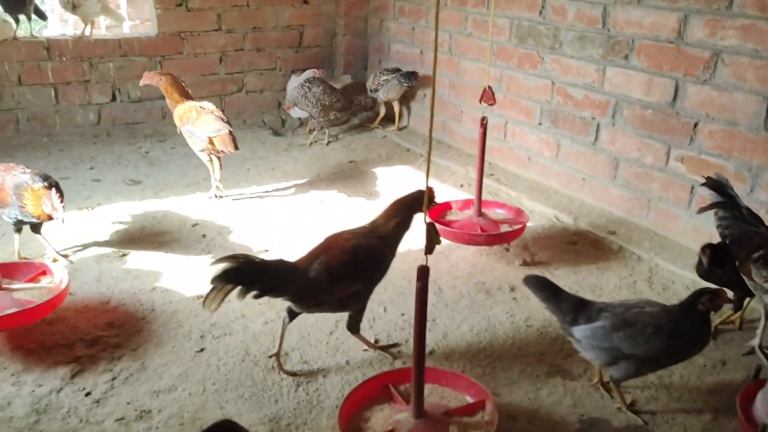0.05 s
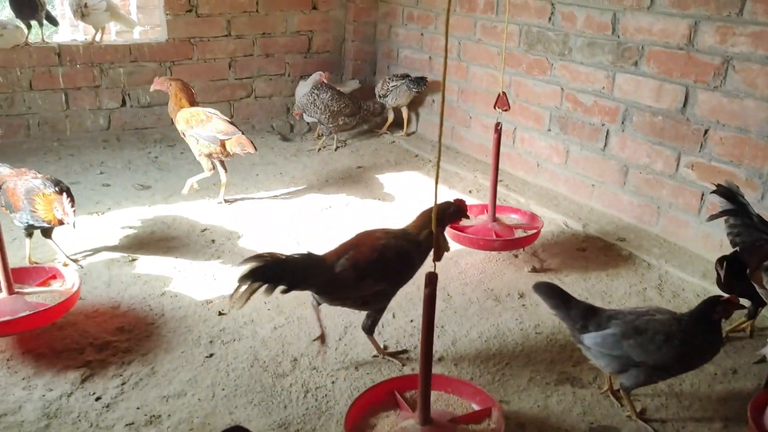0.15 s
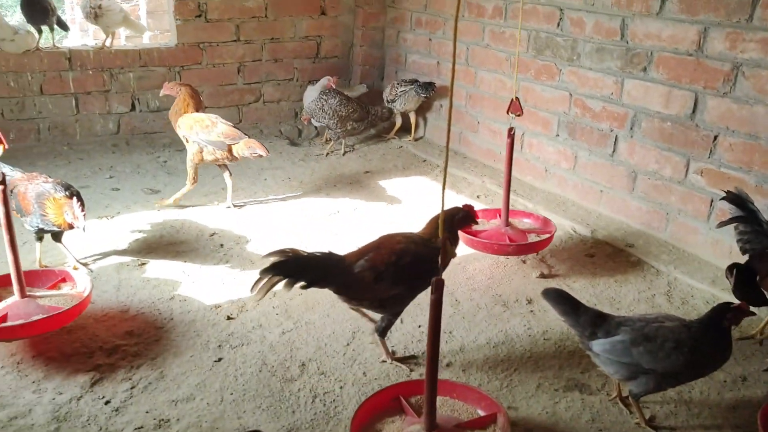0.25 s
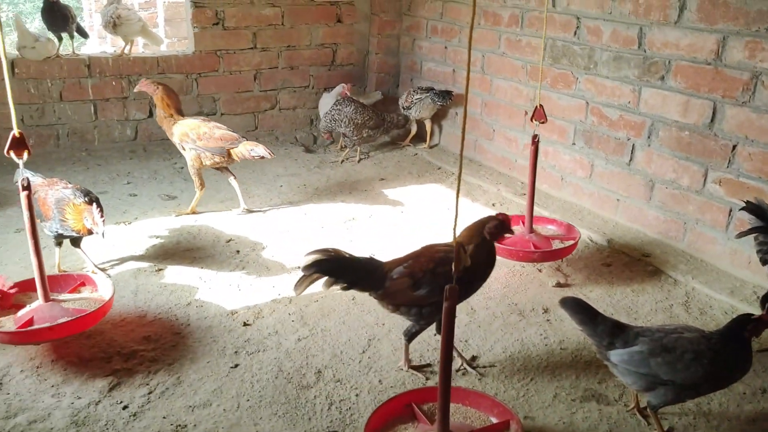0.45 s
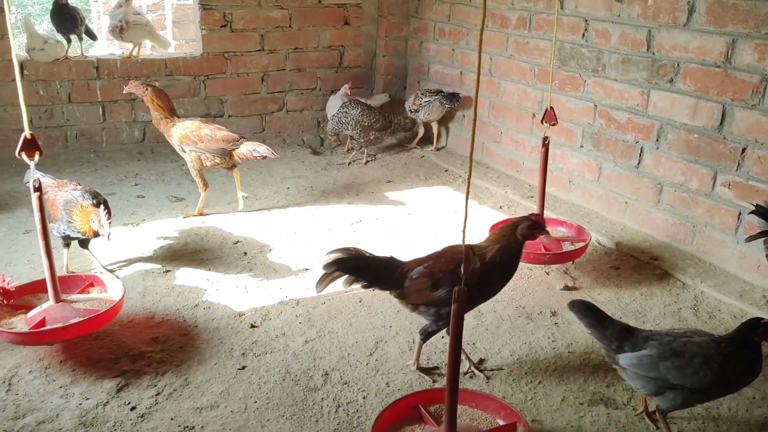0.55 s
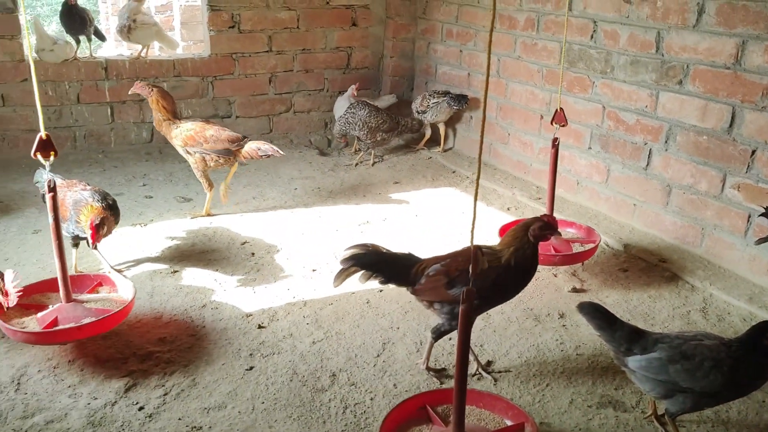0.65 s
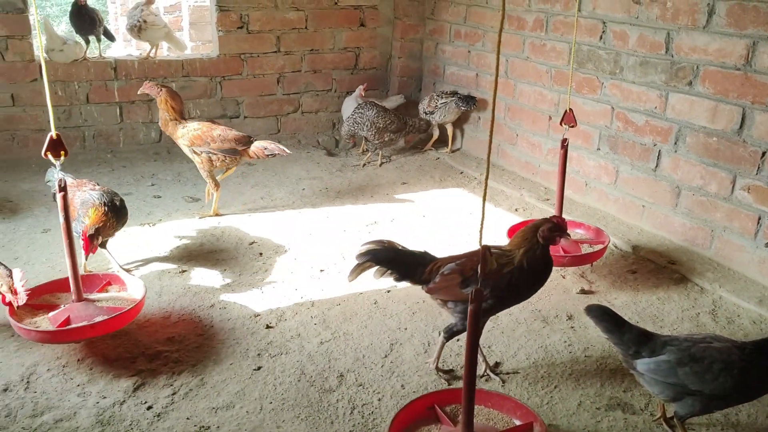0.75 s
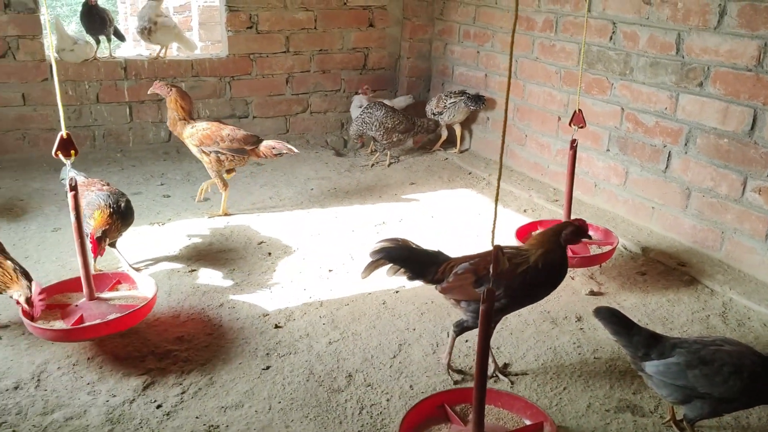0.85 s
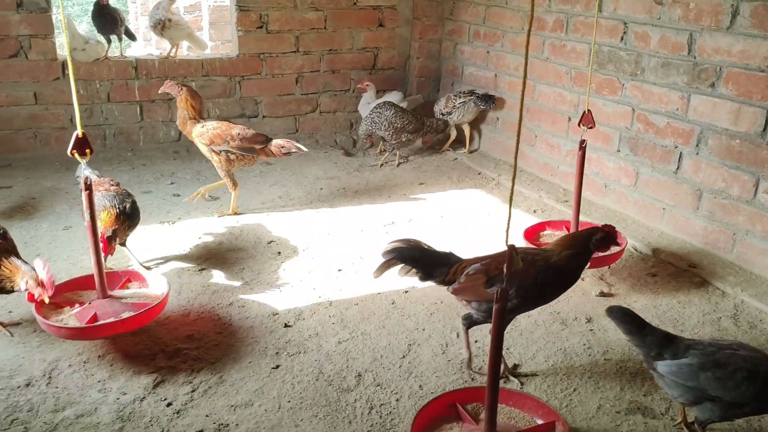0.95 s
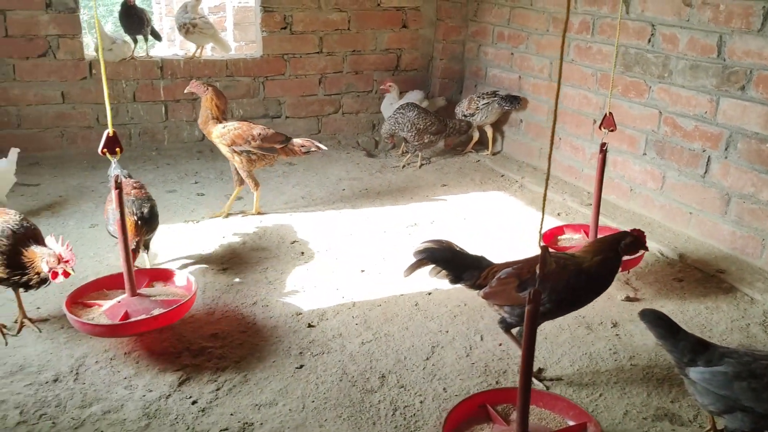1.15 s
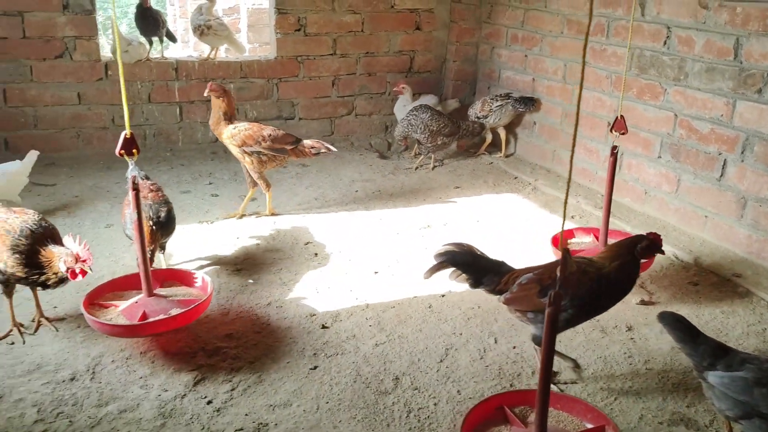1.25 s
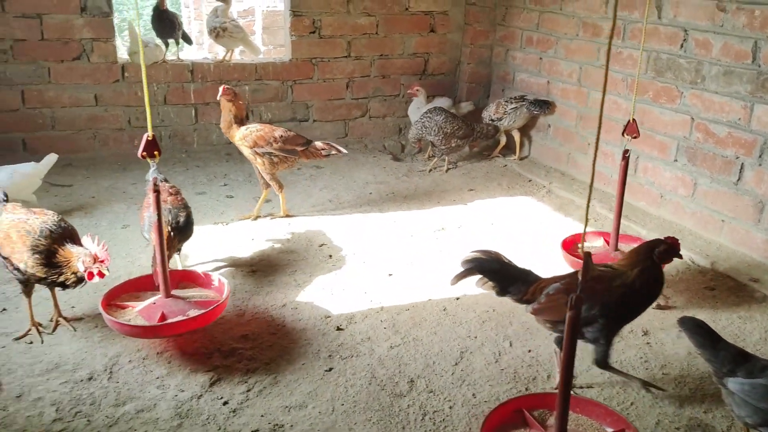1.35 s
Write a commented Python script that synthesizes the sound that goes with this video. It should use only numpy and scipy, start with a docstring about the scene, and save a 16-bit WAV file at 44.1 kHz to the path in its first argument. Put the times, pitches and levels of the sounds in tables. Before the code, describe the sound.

A hen gives one drawn-out cluck while young birds peep in a small coop.

```python
"""Chickens in a small brick coop, over a low rumble, rustling litter and a faint hum.
A light tap, then a hen gives one drawn-out cluck: her voice pulses unevenly in a rasp and clears into a
steady nasal note. Young birds peep further off in mostly falling whistles; after the cluck one holds a
long cheep while a nearer bird squeaks. Three soft thumps pass underneath. Towards the end beaks and feet
tap on the feeders and the floor among the last peeps. The bare walls ring briefly after calls and taps."""
import sys
import numpy as np
from scipy import signal
from scipy.fft import rfft, irfft, next_fast_len
from scipy.io import wavfile
from scipy.ndimage import uniform_filter1d

SR = 44100
rng = np.random.default_rng(int(sys.argv[2]) if len(sys.argv) > 2 else 0)


def master(y):
    """Save y as 16-bit WAV."""
    cut = np.clip(np.atleast_2d(y).T, -1, 1)
    pcm = np.round(cut * 32767)  # scale
    wavfile.write(sys.argv[1], SR, pcm.astype(np.int16))


N = 61739
TIME = np.arange(N) / SR


def from_db(db):
    """Decibels to gain."""
    return 10 ** (np.asarray(db) / 20)


def rms_one(x):
    """Scale to unit power."""
    return x / np.sqrt(np.mean(x ** 2) + 1e-20)


def curve(rows, column):
    """One column of a table as an automation curve over time."""
    rows = np.array(rows)
    return np.interp(TIME, rows[:, 0], rows[:, column])


def loudness(rows):
    """A fader riding the table's last column, silent outside its span."""
    inside = (TIME >= rows[0][0]) & (TIME <= rows[-1][0])
    return from_db(curve(rows, -1)) * uniform_filter1d(inside * 1., size=128)


def at_hz(points, hz, column=1):
    """Read a table on a log-frequency axis."""
    points = np.array(points)
    return np.interp(np.log(hz + 1), np.log(points[:, 0]), points[:, column])


def drift(rate_hz):
    """Smooth random modulation of unit power."""
    r = np.exp(-2 * np.pi * rate_hz / SR)
    return rms_one(signal.lfilter([1], [1, -2 * r, r * r], rng.standard_normal(2 * N))[N:])


def colour(x, points, column=1):
    """Minimum-phase EQ along a table's curve; the result has unit power."""
    size = 2 * next_fast_len(N)
    gain = from_db(at_hz(points, np.fft.rfftfreq(size, 1 / SR), column))
    cepstrum = irfft(np.log(gain))
    cepstrum[1:size // 2] *= 2
    cepstrum[size // 2 + 1:] = 0
    return rms_one(irfft(rfft(x, size) * np.exp(rfft(cepstrum)))[:N])


def band(x, low, high, order=2):
    """Butterworth band-pass."""
    sos = signal.butter(order, [low, min(high, SR * .45)], "band", fs=SR, output="sos")
    return signal.sosfilt(sos, x)


def pulses(hz):
    """One click per cycle, shared between neighbouring samples."""
    turns = np.cumsum(hz) / SR
    at = np.interp(np.arange(1, int(turns[-1])), turns, np.arange(N))
    whole = at.astype(int)
    return np.bincount(whole, 1 - at % 1, N + 1)[:N] + np.bincount(whole + 1, at % 1, N + 1)[:N]


def resonance(x, hz, width_hz):
    """Two-pole resonance with gain 1 at its peak."""
    r = np.exp(-np.pi * width_hz / SR)
    feedback = [1, -2 * r * np.cos(2 * np.pi * hz / SR), r * r]
    return signal.lfilter(np.array([1, 0, -1]) * (1 - r * r) / 2, feedback, x + 1e-18)


def tone(hz, wobble, overtones_db=()):
    """A sine with optional overtones, its pitch wavering by the fraction `wobble`."""
    phase = 2 * np.pi * np.cumsum(hz * (1 + wobble * drift(101.4))) / SR
    return np.sqrt(2) * sum(from_db(db) * np.sin(k * phase) for k, db in enumerate([0, *overtones_db], 1))


# The rumble's EQ. Each row: frequency in Hz, relative level in dB.
RUMBLE_EQ = [(25, -38), (45, -12.5), (65, 0.5), (95, 4.5), (135, -4), (190, -3.5), (260, -3.5), (420, -6.5),
             (700, -9.5), (1200, -13.5), (1700, -17), (2400, -24), (3400, -21), (4600, -30), (8000, -38),
             (16000, -37.5)]
# Fader of the background hiss: rustling litter, plus a brief bright swell at the height of the
# hen's note. Each row: time in seconds, level in dB.
HISS_LEVEL = [(0, -59.5), (.1, -63.5), (.2, -70), (.4, -61.5), (.55, -69), (1.0, -70), (1.4, -70.5)]
# The hiss's EQ. Each row: frequency in Hz, relative level in dB.
HISS_EQ = [(300, -12), (1000, -0.5), (3300, -1), (5000, -5.5), (8000, -4.5), (15000, -20.5)]
# The tones of the hum. Each row: frequency in Hz, level in dB.
HUM_TONES = [(96, -67.5), (189, -69.5), (299, -66), (598, -72)]


def background():
    """The bed: a low noise rumble, a flickering hiss and a wavering hum."""
    rumble = from_db(-55) * colour(rng.standard_normal(N), RUMBLE_EQ)
    hiss_db = curve(HISS_LEVEL, 1) + 1.2 * drift(40)
    hiss = from_db(hiss_db) * colour(rng.standard_normal(N), HISS_EQ)
    hum = sum(from_db(db + 3 * drift(10)) * tone(hz, wobble=.013) for hz, db in HUM_TONES)
    return rumble + hiss + hum


# Soft low thumps. Each row: start in seconds, level in dB.
THUMPS = [(.29, -52), (.685, -67), (.95, -52.5)]


def thumps(hz=89.7, length_s=.052):
    """Each thump is a few cycles of a low tone, swelling and fading."""
    out = np.zeros(N)
    for start, db in THUMPS:
        age = TIME - start
        swell = np.sin(np.pi * np.clip(age / length_s, 0, 1))
        out += np.sqrt(2) * from_db(db) * swell * np.sin(2 * np.pi * hz * age)
    return out


# The coop's reverb time. Each row: frequency in Hz, seconds to fall 60 dB.
COOP_T60 = [(200, 0.47), (290, .68), (570, 0.19), (860, 0.29), (1150, 0.4), (1700, 0.26), (3000, 0.21),
            (4000, 0.23), (8000, 0.14), (16000, 0.16)]


def coop(send, predelay_s=.0055):
    """Diffuse ring of the brick walls, dying band by band."""
    edges_hz = np.geomspace(120, 18000, 15)
    tail = np.zeros(N)
    for low, high in zip(edges_hz, edges_hz[1:]):
        t60 = at_hz(COOP_T60, np.sqrt(low * high))
        tail += band(rng.standard_normal(N), low, high, order=3) * from_db(-60 * TIME / t60)
    tail *= TIME > predelay_s
    midrange_power = np.mean(np.abs(rfft(tail)[N // 100:N // 10]) ** 2)
    return signal.fftconvolve(send, tail / np.sqrt(midrange_power))[:N]


# Pecks and steps. Each row: start in seconds, level in dB, centre in Hz, width in octaves,
# seconds to fall 60 dB.
TAPS = [(0.141, -53, 233.5, 0.73, 0.041), (0.708, -41, 614, 2.34, 0.023), (1.034, -49.5, 1800, 0.87, 0.035),
        (1.036, -53, 6970, 3.6, 0.03), (1.0365, -79, 14800, 0.27, 0.035), (1.083, -53.5, 1570, .4, 0.019),
        (1.2483, -48, 1930, 1.66, 0.019), (1.247, -64, 8500, 0.17, .08), (1.254, -52.5, 2330, 0.52, 0.023),
        (1.31, -54, 5000, 1.7, 0.0064)]


def taps(attack_s=.00054):
    """Beaks and feet knock on feeders and floor: short bursts of dull or bright noise."""
    out = np.zeros(N)
    for start, db, hz, octaves, t60 in TAPS:
        age = np.maximum(TIME - start, 0)
        spread = 2 ** (octaves / 2)
        grit = rms_one(band(rng.standard_normal(N), hz / spread, hz * spread))
        out += grit * np.minimum(age / attack_s, 1) * from_db(db - 60 * np.minimum(age / t60, 2))
    return out


# One long arching cheep. Each row: time in seconds, pitch in Hz, level in dB before the mix.
CHEEP = [(.652, 2624, -63), (.668, 3100, -54), (.70, 3370, -45), (.73, 3226, -51), (.755, 3067, -47),
         (.79, 2710, -52), (.805, 2590, -67)]
# Its second and third harmonics, in dB relative to the first.
CHEEP_OVERTONES_DB = [-12, -24.5]
# Short peeps. Each row: start in seconds, length in seconds, first and last pitch in Hz,
# level in dB before the mix, overtone in relative dB.
PEEPS = [(0.265, .065, 4450, 3365, -53.5, -19), (0.452, 0.08, 5300, 5220, -66, -27),
         (0.511, .045, 4800, 3454, -50.5, -34), (0.552, .08, 4120, 3220, -58, -36),
         (0.669, 0.1, 3118, 2968, -43.5, -21.5), (0.717, 0.049, 4326, 3153, -44, -19),
         (0.756, 0.038, 3134, 2803, -42.5, -43), (1.085, .05, 5370, 4600, -57, -5),
         (1.116, .07, 4476, 3672, -49, -19), (1.319, 0.063, 6120, 4970, -59.5, -19),
         (1.333, .07, 5215, 3860, -54, -9), (1.363, 0.12, 3011, 3110, -39, -17),
         (1.37, 0.057, 1655, 1770, -44, -7)]


def chicks(wobble=.022, attack_s=.031, release_s=.0085):
    """Young birds whistle one long cheep and a scatter of peeps, most sliding down."""
    out = loudness(CHEEP) * tone(curve(CHEEP, 1), wobble, CHEEP_OVERTONES_DB)
    for start, length, first_hz, last_hz, db, overtone_db in PEEPS:
        age = TIME - start
        slide = (1 - np.cos(np.pi * np.clip(age / length, 0, 1))) / 2
        pitch = first_hz + (last_hz - first_hz) * slide
        envelope = np.clip(age / attack_s, 0, 1) * np.clip((length - age) / release_s, 0, 1)
        out += from_db(db) * envelope * tone(pitch, wobble, [overtone_db])
    return out


# The squeak's contour. Each row: time in seconds, pitch in Hz, level in dB.
SQUEAK = [(.682, 1560, -79), (.70, 1610, -47), (.715, 1604, -53), (.726, 1630, -61.5), (.745, 1639, -44.5),
          (.772, 1642, -44), (.795, 1674, -60), (.805, 1640, -64)]


def squeak():
    """One thin, nearly pure tone from a nearer bird."""
    return loudness(SQUEAK) * tone(curve(SQUEAK, 1), wobble=.0013)


# The fader of the rasp that opens the cluck. Each row: time in seconds, level in dB.
RASP_LEVEL = [(.2295, -57), (.2315, -38), (.246, -31.5), (.28, -30.5), (.298, -37), (.335, -36.5),
              (.36, -36.5), (.39, -54.5), (.44, -53)]
# Its resonances. Each row: centre in Hz, width in Hz, relative gain in dB.
RASP_FORMANTS = [(329.6, 22, -2.5), (471.5, 13, 4.5), (626, 60, -6.5), (772, 41, -9.5), (903, 55, 3),
                 (947, 91, 0.5), (1140, 87, -7.5), (1443, 54, -15.5), (1646, 110, -16), (2060, 70, -19),
                 (2247, 69, -18)]


def hen_rasp(pulse_hz=290, jitter=.35):
    """Irregular pulses of the hen's voice ring in narrow resonances."""
    source = pulses(pulse_hz * np.exp(jitter * drift(202.6)))
    voice = sum((-1) ** k * from_db(db) * resonance(source, hz, width)
                for k, (hz, width, db) in enumerate(RASP_FORMANTS))
    voice = band(voice, 260, 2470, order=4)
    levelled = voice / np.sqrt(uniform_filter1d(voice ** 2, size=700) + 1e-14)
    return loudness(RASP_LEVEL) * levelled


# The hen's clear note. Each row: time in seconds, pitch in Hz, level in dB.
HEN_NOTE = [(.232, 304.9, -63), (.262, 299.4, -56), (.285, 293.1, -32), (.31, 288.8, -30),
            (.368, 292.1, -24.5), (.392, 281.1, -26.5), (.425, 283.9, -24), (.462, 277.4, -36.5),
            (.53, 285.9, -60.5)]
# Her throat's EQ. Each row: frequency in Hz, relative dB with the beak open, then with it closing.
THROAT_EQ = [(170, -44, -43), (283, -9.5, -7.5), (550, -4, 3.5), (830, -9, 0), (1148, 1.5, -6.5),
             (1550, -29, -16), (1680, -12.5, -13.5), (2070, -14.5, -14), (2260, -18, -22),
             (2510, -44.5, -37.5), (3860, -36, -40.5)]


def hen_note(jitter=.003, shimmer_db=.5, close_at_s=.383, crossfade_s=.0067):
    """Steady pulses through a throat that darkens as the beak closes."""
    pitch = curve(HEN_NOTE, 1) * (1 + jitter * drift(60))
    source = pulses(pitch) * from_db(shimmer_db * drift(57))
    source = signal.sosfilt(signal.butter(3, 3400, "low", fs=SR, output="sos"), source)
    closing = np.clip((TIME - close_at_s) / crossfade_s + .5, 0, 1)
    bright, dark = colour(source, THROAT_EQ, 1), colour(source, THROAT_EQ, 2)
    return loudness(HEN_NOTE) * ((1 - closing) * bright + closing * dark)


def scene():
    """The mono mix: the hen up front, the young birds set back, all in the same room."""
    hen = hen_note() + hen_rasp()
    young, squeaker, knocks = chicks(), squeak(), taps()
    direct = hen + from_db(-10) * young + squeaker + knocks
    send = from_db(-6.5) * hen + from_db(-3) * young + from_db(-11.5) * squeaker + from_db(4.5) * knocks
    return (direct + coop(send) + thumps() + background())[None]


def record(dry, cutoff_hz=15900):
    """A steep low-pass takes off the very top."""
    return signal.sosfilt(signal.ellip(10, .1, 70, cutoff_hz, fs=SR, output="sos"), dry)


dry = scene()
out = record(dry)
master(out)
```